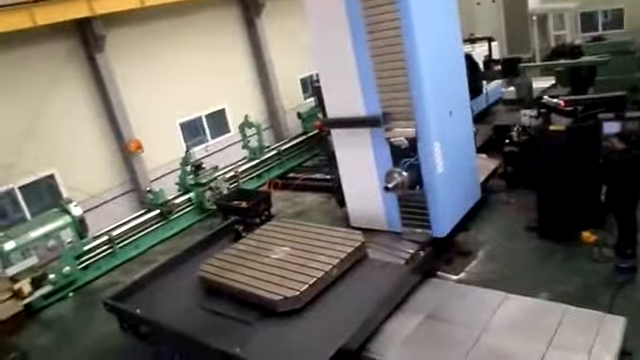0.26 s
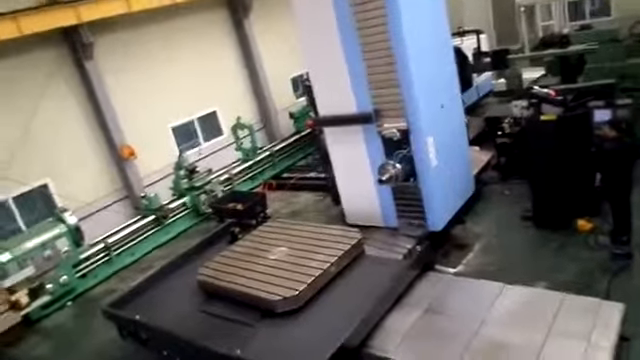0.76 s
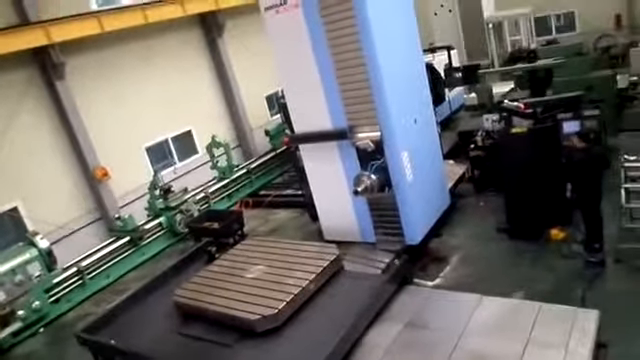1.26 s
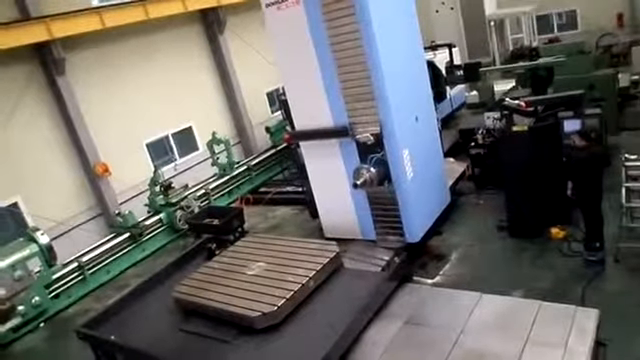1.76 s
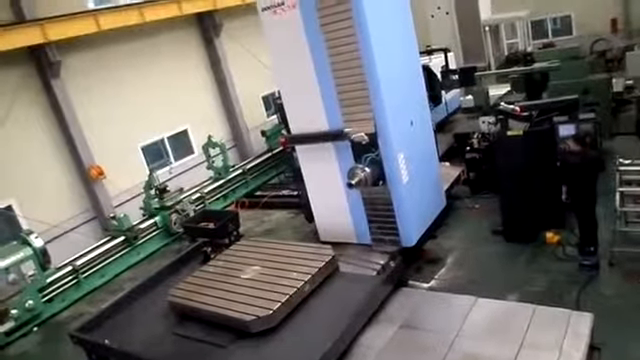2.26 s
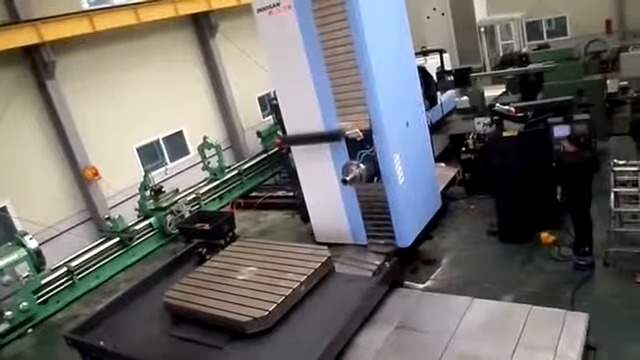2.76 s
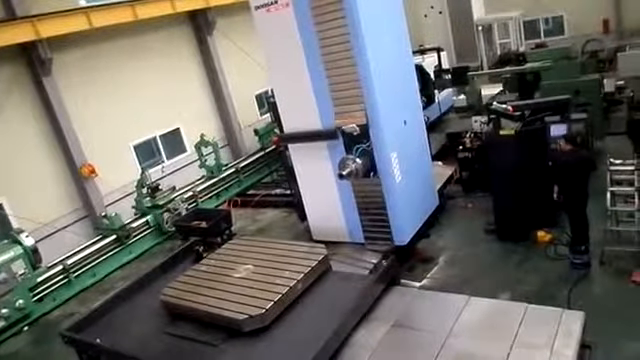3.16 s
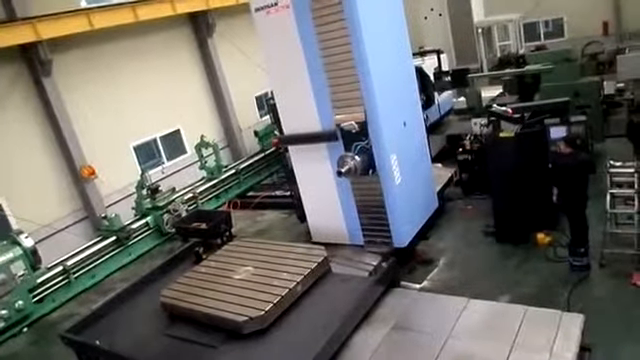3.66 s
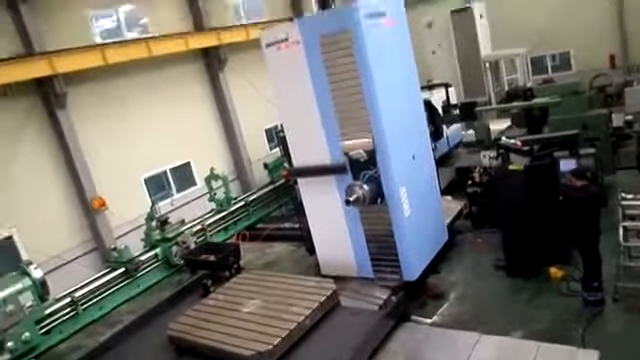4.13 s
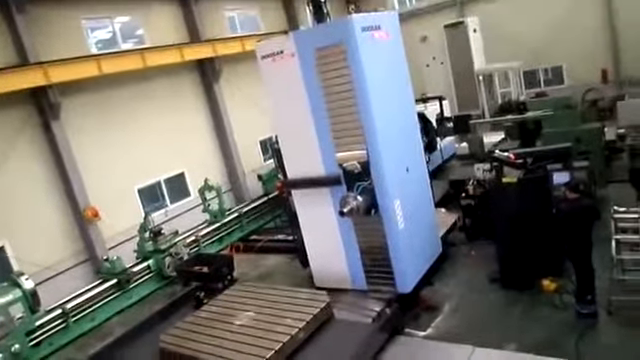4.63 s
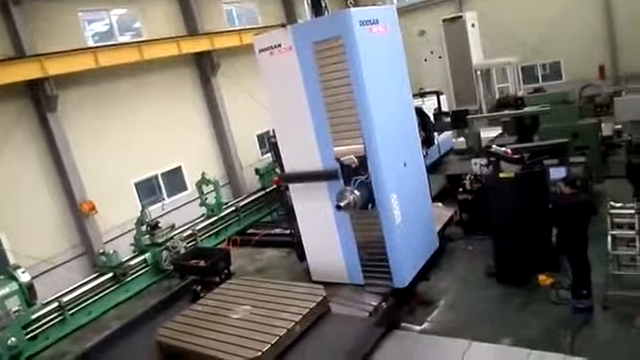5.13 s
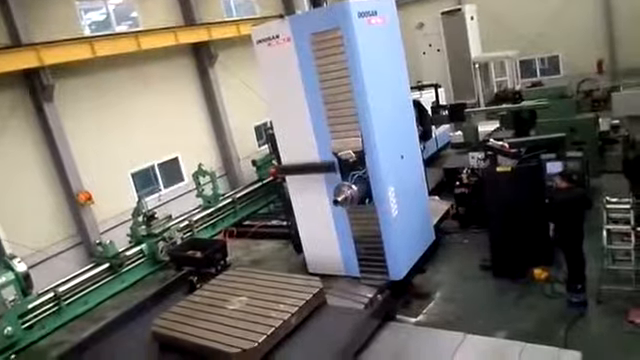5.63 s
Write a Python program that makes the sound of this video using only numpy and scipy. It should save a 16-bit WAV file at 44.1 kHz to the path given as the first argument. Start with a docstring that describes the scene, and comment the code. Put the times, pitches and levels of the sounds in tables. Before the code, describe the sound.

Gear whine climbs, holds over three seconds, sinks to the hall's pump hum and fan roar, then climbs once more at the end.

```python
"""A factory hall roars while a hydraulic pump, fans and the switching tone of an idle drive hum and whine.
A large machine tool then runs two axes up to speed, holds them, stops and starts again the other way.
Gear and screw tones follow the servo shaft as sines of its turn count; rolling contact is shaped noise.
The drive's sidebands spread with speed, noise-driven panels ring and the hall smears the gears.
A thin hiss passes once as treble noise, and a low rumble swells as low noise under rising and falling gains."""
import sys
import numpy as np
from scipy import signal
from scipy.fft import rfft, irfft, next_fast_len
from scipy.io import wavfile
from scipy.ndimage import uniform_filter1d, map_coordinates

SR = 44100
rng = np.random.default_rng(int(sys.argv[2]) if len(sys.argv) > 2 else 0)


def to_wav(s):
    """Save 16-bit WAV."""
    ch = np.atleast_2d(s).T  # columns
    pcm = np.round(np.clip(ch, -1, 1) * 32767)  # PCM
    wavfile.write(sys.argv[1], SR, pcm.astype(np.int16))


N = 259749
TIME = np.arange(N) / SR  # s
TOP_RPS = 100 / 3  # servo shaft turns a second at full speed


def amp(db):
    """Decibel law: amplitude ratio of a level."""
    return 10 ** (np.asarray(db) / 20)


def unit(x):
    """Normalisation to an rms of 1."""
    return x / np.sqrt(np.mean(x ** 2) + 1e-20)


def along(points, hz):
    """Linear interpolation of (Hz, value) points on a logarithmic frequency axis."""
    point_hz, values = np.transpose(points)
    return np.interp(np.log(hz + 1), np.log(point_hz + 1), values)


def curves(rows):
    """Linear interpolation in time: one value per sample for each column after the seconds."""
    seconds, *columns = np.transpose(rows)
    return [np.interp(TIME, seconds, column) for column in columns]


def wobble(rate):
    """Slow random modulation: a spline through random knots, rate of them a second."""
    coarse = TIME[::32]
    knots = rng.standard_normal(int(N * rate / SR) + 4)
    return np.interp(TIME, coarse, map_coordinates(knots, [coarse * rate]))


def filtered(x, response):
    """Linear filtering: the spectrum of x times a response of frequency."""
    size = next_fast_len(N + 3 * SR)
    return irfft(rfft(x, size) * response(np.fft.rfftfreq(size, 1 / SR)), size)[..., :N]


def lagging(x, seconds):
    """First-order lag: x followed with a time constant."""
    keep = np.exp(-1 / (seconds * SR))
    return signal.lfilter([1 - keep], [1, -keep], x)


def rush(spectrum, patchy_db):
    """Broadband noise of rms 1: random gain patches in time and frequency, then spectral shaping."""
    grid = signal.stft(rng.standard_normal(N), nperseg=512)[2]
    patches = uniform_filter1d(rng.standard_normal(grid.shape), 6, 0)
    patches = uniform_filter1d(patches, 14, 1)
    noise = signal.istft(grid * amp(patchy_db * unit(patches)), nperseg=512)[1][:N]
    return unit(filtered(noise, lambda hz: amp(along(spectrum, hz))))


def tone(cycles, db):
    """Pure tone: a sine of the given running cycle count and rms level."""
    return np.sqrt(2) * amp(db) * np.sin(2 * np.pi * cycles)


# Spectrum of the hall's steady noise. Each row: frequency in Hz, relative density in dB per Hz.
HALL_SPECTRUM = [(12, -54), (20, -27.5), (173, -11), (215, -12), (269, -9), (396, -12), (442, -14),
                 (493, -14.5), (1260, -14.5), (1760, -19.5), (2450, -19), (3920, -27.5), (9760, -35),
                 (13200, -36.5), (14800, -60)]


def hall_roar():
    """Stationary broadband noise: the steady roar of the hall, slightly unsteady in level."""
    return amp(-34.5 + 1.0 * wobble(4.126)) * rush(HALL_SPECTRUM, patchy_db=0.46)


PUMP_HZ = 269.05  # piston rate
# Piston harmonics of the pump. Each row: multiple of the piston rate, mid level in dB rms before a small trim.
PUMP_HARMONICS = [(1, -37), (2, -48), (8, -55), (9, -48), (11, -57), (12, -53), (13, -60), (19, -66)]
# Fan or motor hums. Each row: frequency in Hz, mid level in dB rms.
FAN_HUMS = [(120, -50.5), (185, -52), (291, -47.5), (360, -48.5), (447, -50)]


def pump_and_fans():
    """Harmonic series of the pistons, its higher members the steadiest, beside unsteady fan hums."""
    out = np.zeros(N)
    for k, db in PUMP_HARMONICS:
        phase = 0.089 * wobble(10) / np.sqrt(k)
        flutter = (1.0 * wobble(6.06) + 1.87 * wobble(30)) / np.sqrt(k)
        out += tone(k * PUMP_HZ * TIME + phase, db + 0.055 + flutter)
    for hz, db in FAN_HUMS:
        out += tone(hz * TIME + 0.25 * wobble(8), db + 3 * wobble(7))
    return out


RAMP_S, ROUND_S, LAG_S = .44, .1, .04  # command's straight speed ramp, its rounded corners, the servo's lag
# Commanded moves. Each row: start in seconds, start of braking in seconds, direction as a sign.
MOVES = [(.14, 3.94, 1), (5.155, 7, -1)]


def axis():
    """Servo kinematics: speed share, effort (1 speeding up, -1 braking) and place in turns from the start."""
    command = np.zeros(N)
    for on, off, way in MOVES:
        rise = np.clip((TIME - on) / RAMP_S, 0, 1)
        fall = np.clip((TIME - off) / RAMP_S, 0, 1)
        command += way * (rise - fall)
    velocity = lagging(uniform_filter1d(command, int(ROUND_S * SR)), LAG_S)
    speed = abs(velocity)
    effort = np.gradient(speed) * SR * RAMP_S
    return speed, effort, np.cumsum(velocity) * TOP_RPS / SR


TAIL_T60_S = 1.14  # reverberation time


def diffuse(x):
    """Reverberation: decaying noise answers what changes; tones repeating each screw turn carry their share."""
    tail = rng.standard_normal(SR) * amp(-60 * TIME[:SR] / TAIL_T60_S)
    # three shaft turns make one turn of the screw
    change = x - np.pad(x, (round(3 * SR / TOP_RPS), 0))[:N]
    return signal.fftconvolve(change, tail / np.linalg.norm(tail))[:N]


SWITCH_HZ, POLE_PAIRS = 4000, 4  # switching rate of the drive; pole pairs of the motor
TAIL_WHINE_DB = -16  # tail against direct sound
# Sidebands. Each row: multiple of the switching rate, multiple of the winding frequency,
# level in dB rms before casing colour, flutter and growth with speed.
SIDEBANDS = [(1, -1, -67), (1, 1, -70), (2, 2, -37), (2, -2, -50), (2, 3, -63), (2, 4, -68), (3, 1, -68)]
# Response of the motor casing. Each row: frequency in Hz, gain in dB.
CASING_GAIN = [(7600, 12.5), (7740, 0), (7900, 8), (7980, 16), (8030, -11.5), (8070, -4), (8140, 6),
               (8220, -2), (8262, 0.5)]
# Pair three winding frequencies off the third multiple. Each row: time in seconds,
# lower tone in dB rms, upper tone in dB rms, both before flutter and growth with speed.
HIGH_PAIR_LEVELS = [(.4, -54, -43), (.85, -58, -78), (1.3, -74, -72), (2.7, -78, -68), (4, -78, -67),
                    (5.6, -71, -57), (5.89, -60, -51)]


def drive_whine(speed, turns):
    """Pulse-width modulation: sidebands grow with motor voltage, hence with speed; the middle tone sounds
    throughout and rises by up to 9 dB with speed."""
    winding = POLE_PAIRS * turns
    smooth_speed = abs(uniform_filter1d(speed, SR // 6))
    out = tone(2 * SWITCH_HZ * TIME, -63 + 9 * np.sqrt(smooth_speed) + 0.42 * wobble(2.6))
    for carrier, side, db in SIDEBANDS:
        colour = along(CASING_GAIN, carrier * SWITCH_HZ + side * POLE_PAIRS * TOP_RPS * speed)
        flutter = 2.4 * wobble(2.92) + 0.67 * wobble(30)
        out += speed ** 0.54 * tone(carrier * SWITCH_HZ * TIME + side * winding, db + colour + flutter)
    for side, db in zip((-3, 3), curves(HIGH_PAIR_LEVELS)):
        out += speed ** 2 * tone(3 * SWITCH_HZ * TIME + side * winding, db + 1.5 * wobble(14))
    # mostly heard directly: the air soaks up the echoes of treble
    return out + amp(TAIL_WHINE_DB) * diffuse(out)


def loudness_db(speed, effort, grow, push_db, brake_db):
    """Load dependence: level against steady full speed as a power of speed, shifted by effort."""
    load_db = push_db * np.maximum(effort, 0) + brake_db * np.maximum(-effort, 0)
    return 20 * grow * np.log10(speed + 1e-3) + load_db


# Response of the machine frame. Each row: frequency in Hz, gain in dB.
FRAME_GAIN = [(300, -10), (700, -12), (780, -2), (850, 7), (890, 4), (940, 8), (990, 2), (1050, 3),
              (1110, 2), (1170, 6), (1200, 1.5), (1330, -1.5), (1600, -10), (2000, -10.5), (2400, -15),
              (3000, -19), (3600, -12), (8000, -52)]


def frame_db(multiple, speed):
    """Structural transfer: the frame's gain at a gliding tone against its gain at full speed."""
    return along(FRAME_GAIN, multiple * TOP_RPS * speed) - along(FRAME_GAIN, multiple * TOP_RPS)


# Main gear tones wax and wane along the bed. Each row: time in seconds, then offsets in dB of
# the 37th, 36th and 39th shaft multiples and the 109th screw multiple.
MAIN_TONE_DRIFT = [(.45, -6, -5, -6, 0), (.55, -6, -4, -6, 2), (.63, -8, -2, -8, 5), (.7, -8, 5.5, -10, 11),
                   (.8, -6, -4, -8, 27), (.9, -1, -3, 0, 13.5), (1, -6, 1, 2, -2), (1.1, -11.5, 1, -2, 7),
                   (1.2, -3.5, -2, -2, -4), (1.3, 1, -17, 3, -13), (1.4, -0.5, -31, -1, -7),
                   (1.6, 2.5, -26, 1.5, -10), (2, 1.5, -2, -1, -13), (2.3, 1, 6, -4, 2), (2.65, 0, 5, 3, 2),
                   (3, 2.5, 1.5, -1, -3), (3.35, -4.5, -10, 1, -5), (3.6, -4, -3.5, 4.5, -5),
                   (3.85, -5, -2.5, 5, -15), (3.97, -2, 9, 2, -11), (4.07, 1, -9, 1, 1),
                   (4.2, -2, -2, -3, 0), (4.3, -2.5, -4, -8, 0), (4.45, -6, -2, -8, 0), (5.45, 0, 2, 0, 0),
                   (5.55, 0, 8.5, 0, -1), (5.63, 0, 4.5, 0, -1), (5.72, -3, 6, -3, 6),
                   (5.82, -5, 5.5, -3, 16), (5.89, -1, -3, -3, 4)]


def drift_db(multiple):
    """Amplitude modulation: a set course for the main tones, a random one for the others."""
    own = dict(zip((37, 36, 39, 109 / 3), curves(MAIN_TONE_DRIFT)))
    return own[multiple] if multiple in own else 2.0 * wobble(2.06)


FIRST_MESH_TOP = 41.5  # multiples of the shaft speed below this belong to the first mesh
PANEL_SHIFT = .27  # cycles by which tones above the panel's band lead, and those below it lag
PANEL_BAND = (34.8, 38.5)  # multiples of the shaft speed that the main panel sends out in step


def path_cycles(multiple):
    """Phase of the path: first-mesh tones throb in step; higher ones come by many paths, at random."""
    if multiple < FIRST_MESH_TOP:
        return PANEL_SHIFT * (np.searchsorted(PANEL_BAND, multiple) - 1)
    return rng.random()


def force_at(multiple, speed):
    """Excitation force: higher multiples need more speed to sound."""
    return speed ** ((multiple / 36) ** 0.6)


START_TURN = 2.12  # where the shaft stands before it moves, in turns
GEARS_DB, GEARS_GROW = -0.93, 0.23  # shared offset; power of speed
GEARS_PUSH_DB, GEARS_BRAKE_DB = -3, -3.5  # change while speeding up; while braking
GEARS_DB_PER_TURN = 0.0044  # the column travels away and comes back
SECOND_TONES = (37, 38, 39, 41)  # shaft multiples sounded by the second axis
# uneven tooth contact rides on the mesh: multiple of the shaft speed, spread, level before shared gain and load
MESH_MULTIPLE, MESH_SPREAD_HZ, MESH_DB = 36.15, 60, -41
MESH_LOAD_DB = 10.5  # tooth contact is rougher while the speed changes
# Tones of the servo shaft. Each row: multiple of the shaft speed,
# level in dB rms before the shared gain, frame and drift.
SHAFT_TONES = [(27, -50.7), (35, -48.0), (36, -32.9), (37, -25.7), (38, -44.6), (39, -34.6), (40, -45.1),
               (41, -42.9), (46, -50.7), (47, -54.8), (48, -53.2), (51, -51.0), (53, -53.8), (55, -55.3),
               (69, -55.8), (71, -51.7), (72, -49.6), (73, -45.4), (75, -47.8), (87, -59.5), (92, -56.6),
               (97, -58.1), (98, -58.5), (100, -48.1), (104, -53.2), (107, -43.3), (108, -47.5),
               (109, -48.2), (113, -56.2), (123, -61.7), (124, -60.1), (131, -54.2), (132, -58.4),
               (133, -60.8), (143, -51.7), (144, -57.3), (145, -50.6), (192, -61.2), (216, -55.4),
               (217, -59.9)]
# Tones of the screw. Each row: multiple of the screw speed (a third of the shaft's),
# level in dB rms before the shared gain, frame and drift.
SCREW_TONES = [(79, -49.9), (104, -38.1), (106, -36.6), (107, -40.5), (109, -45.8), (121, -45.6),
               (215, -49.9), (217, -49.4), (218, -47.9), (223, -55.7), (227, -51.4), (319, -54.3),
               (325, -47.7), (431, -60.6)]


def gear_train(speed, effort, place, turns):
    """Order-locked excitation: the first axis' tones at multiples of shaft and screw, upper shaft tones apart."""
    train_db = GEARS_DB + GEARS_DB_PER_TURN * place
    train_db = train_db + loudness_db(speed, effort, GEARS_GROW, GEARS_PUSH_DB, GEARS_BRAKE_DB)
    lower, upper = np.zeros(N), np.zeros(N)
    for multiple, db in SHAFT_TONES + [(k / 3, db) for k, db in SCREW_TONES]:
        if multiple in SECOND_TONES:
            continue
        level_db = db + train_db + frame_db(multiple, speed) + drift_db(multiple)
        cycles = multiple * turns + path_cycles(multiple)
        sound = force_at(multiple, speed) * tone(cycles, level_db)
        # whole multiples come from the shaft
        if multiple > FIRST_MESH_TOP and multiple % 1 == 0:
            upper += sound
        else:
            lower += sound
    mesh_db = MESH_DB + train_db + frame_db(MESH_MULTIPLE, speed) + MESH_LOAD_DB * abs(effort)
    roughness = force_at(MESH_MULTIPLE, speed) * unit(wobble(MESH_SPREAD_HZ))
    lower += roughness * tone(MESH_MULTIPLE * turns, mesh_db)
    return lower, upper


ROLL_DB, ROLL_GROW = -32.5, 0.89  # base level; power of speed
ROLL_PUSH_DB, ROLL_BRAKE_DB = 0.5, 6.5  # extra while speeding up; while braking
ROLL_DB_PER_TURN = -0.0489  # change as the column travels
# Spectrum of the first axis' rolling noise. Each row: frequency in Hz, relative density in dB per Hz.
ROLL_SPECTRUM = [(300, -10.5), (600, -11), (870, 0.5), (1050, -2), (1200, 5.5), (1350, 3.5), (1550, -6),
                 (2000, -7.5), (3000, -8.5), (4200, -12.5), (6800, -18), (8400, -19.5), (9500, -17.5),
                 (13000, -36), (15000, -37)]


def rolling_noise(speed, effort, place):
    """Rolling contact: broadband noise that grows with speed and load and changes with place."""
    level_db = ROLL_DB + ROLL_DB_PER_TURN * place
    level_db = level_db + loudness_db(speed, effort, ROLL_GROW, ROLL_PUSH_DB, ROLL_BRAKE_DB)
    return amp(level_db + 0.24 * wobble(2.7)) * rush(ROLL_SPECTRUM, patchy_db=3.0)


GLIDE_DRY_DB, GLIDE_WET_DB, SETTLE_S = -10, 8, .08  # direct and tail gain at full effort; settling lag
TAIL_GEARS_DB = -8.5  # tail gain without gliding


def in_hall(gears, effort):
    """Direct and diffuse field: gliding tones build no clear standing sound, so more tail until they settle."""
    gliding = np.maximum(abs(effort), lagging(abs(effort), SETTLE_S))
    tail = diffuse(amp(TAIL_GEARS_DB + GLIDE_WET_DB * gliding) * gears)
    return amp(GLIDE_DRY_DB * gliding) * gears + tail


LINGER_SHARE, LINGER_S = .85, .2  # share that stands in the hall; how slowly it builds and dies


def lingering(x):
    """Standing sound: echoes one full-speed turn apart keep steady tones and hold them on when speed changes."""
    keep = np.exp(-1 / (TOP_RPS * LINGER_S))

    def response(hz):
        echoes = (1 - keep) / (1 - keep * np.exp(-2j * np.pi * hz / TOP_RPS))
        return 1 - LINGER_SHARE + LINGER_SHARE * echoes
    return filtered(x, response)


RINGING_GROW, RINGING_S = 2.2, .17  # power of speed; how slowly they build and die
# Panel resonances shaken by the gears. Each row: frequency in Hz, spread in Hz, level in dB at full speed.
PANEL_RESONANCES = [(2410, 80, -47), (3565, 130, -43), (4825, 72, -57)]


def panels(speed):
    """Resonance: fixed panel modes, shaken into narrow noise while the gears run fast."""
    out = np.zeros(N)
    for hz, spread_hz, db in PANEL_RESONANCES:
        out += unit(wobble(spread_hz)) * tone(hz * TIME, db)
    return lagging(speed ** RINGING_GROW, RINGING_S) * out


SECOND_S = .33  # the second axis makes the same moves this much later


def later(x):
    """Time delay: the same motion, as the second axis makes it."""
    return np.interp(TIME - SECOND_S, TIME, x)


SECOND_GROW = 6.6  # power of speed: its tones fade fast below full speed
SECOND_GAINS = .09  # cycles a second that its tones gain as it draws nearer
IN_STEP_S = 2.85  # the moment both axes are in step
SECOND_ROLL_DB, SECOND_ROLL_GROW = -37, 1.1  # rolling level at full speed; power of speed
# Spectrum of the second axis' rolling noise. Each row: frequency in Hz, relative density in dB per Hz.
SECOND_ROLL_SPECTRUM = [(900, -26), (1100, -8.5), (1200, 2), (1350, 1), (1500, -14), (1800, -38.5)]


def second_axis(speed, turns):
    """Doppler shift and rolling contact: four gear tones of the later axis, slightly raised, with its noise."""
    second_speed, second_turns = later(speed), later(turns)
    rolling = rush(SECOND_ROLL_SPECTRUM, patchy_db=3.0)
    out = amp(SECOND_ROLL_DB) * second_speed ** SECOND_ROLL_GROW * rolling
    gained = SECOND_GAINS * (TIME - IN_STEP_S)
    for multiple, db in SHAFT_TONES:
        if multiple in SECOND_TONES:
            level_db = db + GEARS_DB + frame_db(multiple, second_speed) + drift_db(multiple)
            cycles = multiple * second_turns + path_cycles(multiple) + gained
            out += second_speed ** SECOND_GROW * tone(cycles, level_db)
    return out


HISS_S, HISS_EDGE_S = (0.99, 1.64), .05  # span; length of the fades at its ends
HISS_DB, HISS_GROWS_DB_PER_S = -52, 15  # level at the start; growth
# Spectrum of the thin hiss. Each row: frequency in Hz, relative density in dB per Hz.
HISS_SPECTRUM = [(3000, -32), (6000, 7), (9000, 1), (12000, -1), (14000, 5), (15000, -17)]


def hiss():
    """Gated treble noise: one spell of thin hiss that grows before it ends."""
    on, off = HISS_S
    gate = np.clip(np.minimum(TIME - on, off - TIME) / HISS_EDGE_S + .5, 0, 1)
    growth = amp(HISS_DB + HISS_GROWS_DB_PER_S * (TIME - on))
    return gate * growth * rush(HISS_SPECTRUM, patchy_db=4.0)


SWELL_RISE_DB_PER_S, SWELL_FALL_DB_PER_S = 130, 90
# Swells of the low rumble. Each row: peak time in seconds, peak level in dB.
RUMBLE_SWELLS = [(1.33, -35), (1.45, -31.5), (1.53, -34), (1.65, -27), (1.73, -32.5), (1.83, -35.5),
                 (1.92, -41), (2.15, -40)]
# Spectrum of the low rumble. Each row: frequency in Hz, relative density in dB per Hz.
RUMBLE_SPECTRUM = [(20, -29), (50, -12), (100, -7.5), (150, -3), (220, -0.5), (270, 4.5), (320, -1),
                   (420, -1), (520, -6), (700, -10), (1500, -41)]


def rumble():
    """Exponential rise and decay: lumpy low noise in overlapping swells."""
    swells = np.zeros(N)
    for peak_s, db in RUMBLE_SWELLS:
        drop_db = np.maximum(SWELL_RISE_DB_PER_S * (peak_s - TIME), SWELL_FALL_DB_PER_S * (TIME - peak_s))
        swells += amp(db - drop_db)
    lumps = amp(1.8 * wobble(45.04))
    return swells * unit(lumps * rush(RUMBLE_SPECTRUM, patchy_db=-1.0))


def scene():
    """Superposition: one motion drives gears, panels and drive; the other sounds add independently."""
    speed, effort, place = axis()
    turns = START_TURN + np.cumsum(speed) * TOP_RPS / SR  # counts up in either direction
    background = hall_roar() + pump_and_fans()
    whine = drive_whine(speed, turns)
    lower, upper = gear_train(speed, effort, place, turns)
    first = in_hall(lower + rolling_noise(speed, effort, place), effort)
    gears = first + lingering(upper) + panels(speed)
    second = in_hall(second_axis(speed, turns), later(effort))
    return (background + whine + gears + second + hiss() + rumble())[None]


TOP_HZ = 14920  # band limit


def record(dry):
    """Band limiting: nothing is kept from the limit upwards."""
    return filtered(dry, lambda hz: hz < TOP_HZ)


dry = scene()
out = record(dry)
to_wav(out)
```